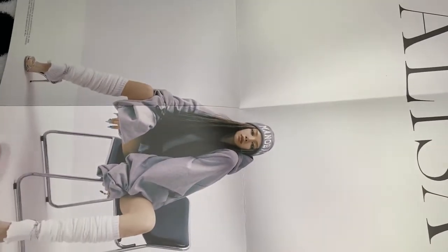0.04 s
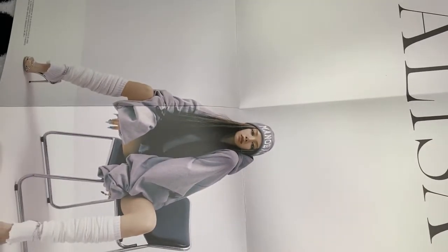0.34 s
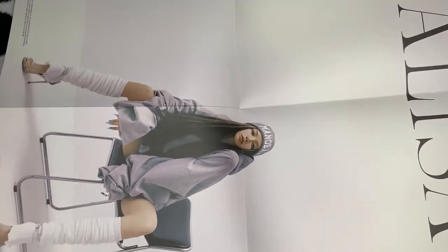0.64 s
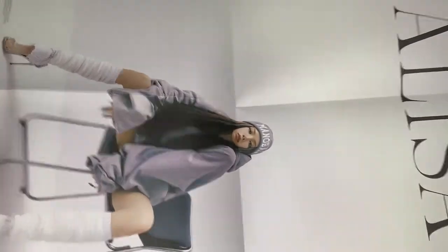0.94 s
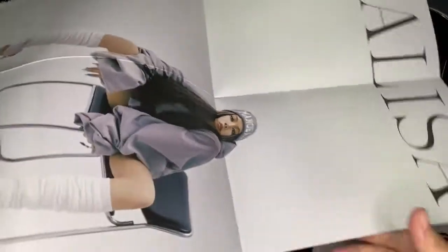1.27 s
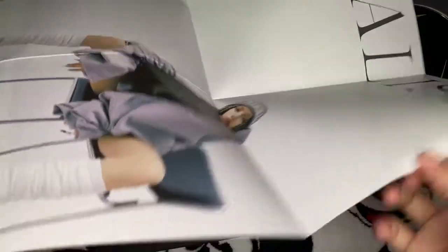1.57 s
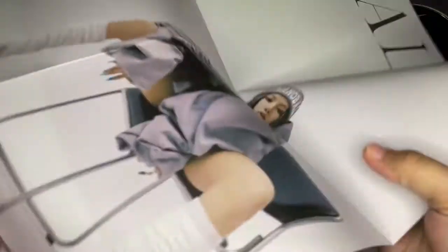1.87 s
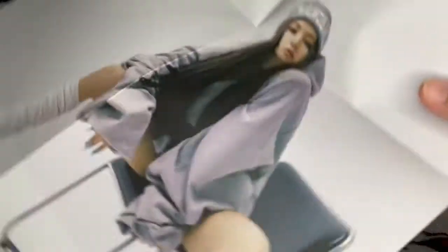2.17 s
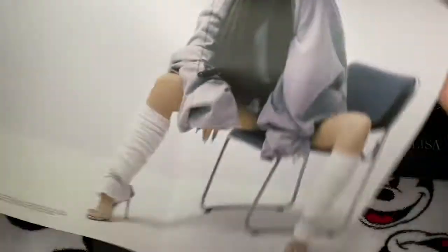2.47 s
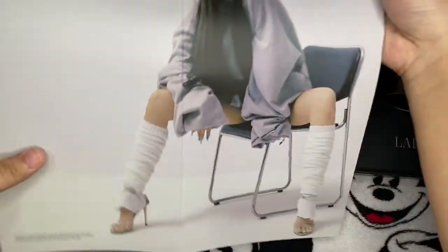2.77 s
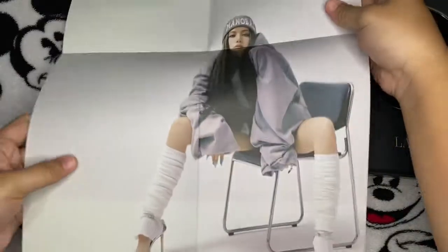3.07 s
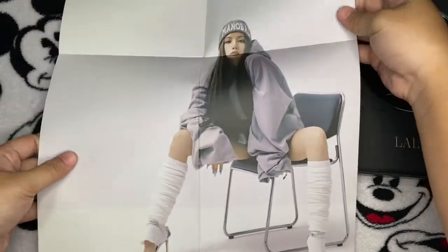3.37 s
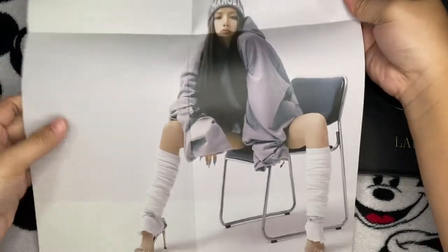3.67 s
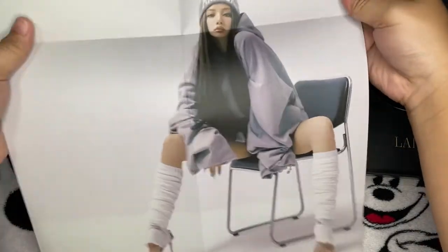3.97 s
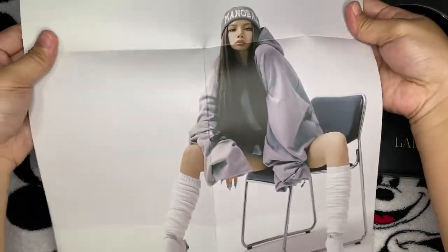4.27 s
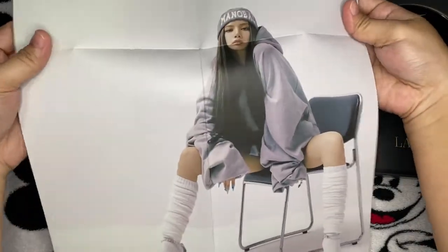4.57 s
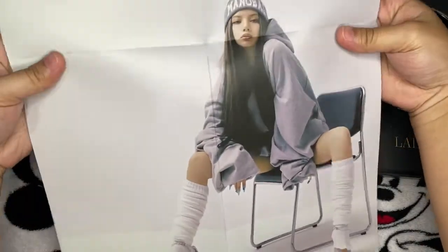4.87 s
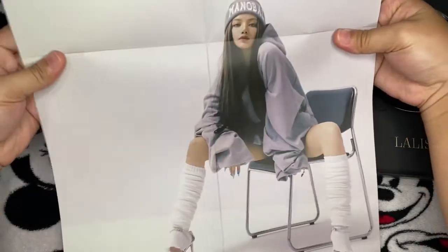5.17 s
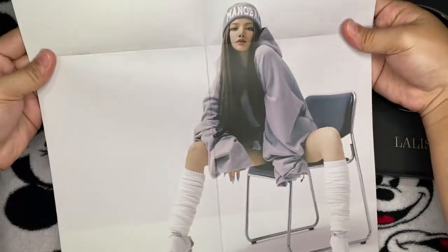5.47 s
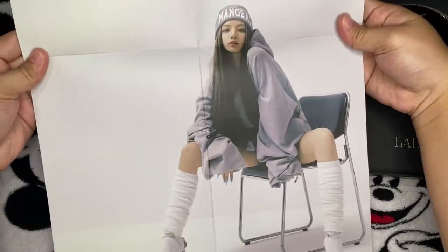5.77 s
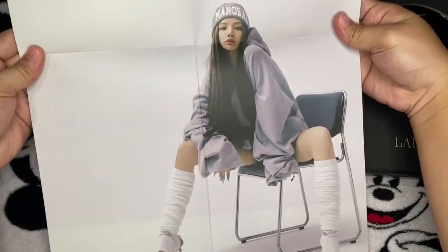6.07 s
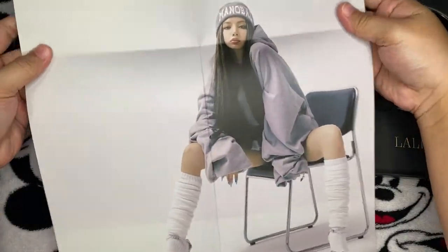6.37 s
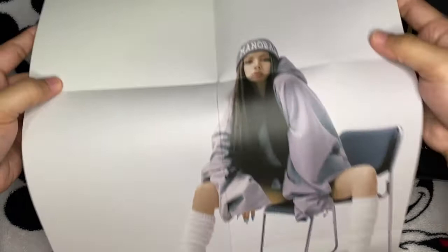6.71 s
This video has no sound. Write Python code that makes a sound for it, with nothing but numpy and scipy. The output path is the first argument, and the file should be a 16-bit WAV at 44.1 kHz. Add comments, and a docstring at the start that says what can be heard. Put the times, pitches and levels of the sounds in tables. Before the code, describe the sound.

For the first second there is only the soft, steady air and low hum of a fan in a small room. At about 0.9 seconds a large folded paper poster starts to move close to the microphone. Until around 2.5 seconds its creases pop in a quick, uneven run, strongest near 1.2 and 1.9 seconds, mixed with rustling, small sharp crackles, soft low flops and the hiss of paper sliding under fingers. A loud hollow pop with a crackle and flap comes at 3 seconds, followed by a smaller one at 3.4. Lighter pops and rustles occur around 4 seconds, and a crisp crack near 4.8. Another loud cluster of pops and low flaps lands between 4.9 and 5.1 seconds. The sheet then mostly rests, with a soft flex near 6.3 seconds and a faint brush at the end, over the continuing fan.

```python
"""A fan hums in a small room; after about a second, a large folded sheet of glossy paper pops and rustles
close by as it is lifted, turned and held open. Its creases buckle, and since bending waves are dispersive,
each pop runs through the sheet as a falling chirp. Dents flip with a hollow pock, whole panels flop over
and push the air, fibres crackle as they give way, and the paper hisses as it slides under the fingers."""
import sys
import numpy as np
from scipy import signal
from scipy.fft import rfft, irfft, next_fast_len
from scipy.io import wavfile

SR = 44100
rng = np.random.default_rng(int(sys.argv[2]) if len(sys.argv) > 2 else 0)


def inscribe(sig):
    """Save sig as 16-bit PCM at rate SR to the path in sys.argv[1].

    A 1-D sig is mono; a 2-D sig holds one channel per row.
    Samples are clipped to [-1, 1] before scaling.
    """
    pcm = np.round(np.clip(np.atleast_2d(sig).T, -1, 1) * 32767)
    wavfile.write(sys.argv[1], SR, pcm.astype(np.int16))


N = 306206
TIME = np.arange(N) / SR

# Levels in the tables are relative: each source adds its own gain.
# spectrum of the fan's moving air: (frequency [Hz], level [dB])
FAN_AIR_SPECTRUM = [(25, -30), (50, -1), (125, -3.5), (165, -11.5), (270, -3), (330, -12), (460, -7),
                    (780, -9.5), (970, -5.5), (1130, -11.5), (1750, -14.5), (2030, -13), (3200, -20.5),
                    (5000, -30.5), (9000, -35.5), (16000, -37)]
# partials of the fan's motor: (frequency [Hz], level [dB])
HUM_PARTIALS = [(58.3, -64.5), (172.5, -63.5), (231, -70)]
# how much of the fan's hum gets past the sheet: (time [s], level [dB])
HUM_LEVEL = [(0, 7.5), (1.9, 9.5), (2.75, -1.5), (3.6, 6.5), (4.6, 1), (5.3, 5), (6.94, 0)]
# reverberation of the room: (frequency [Hz], time to fall by 60 dB [s])
REVERB_TIMES = [(900, 0.23), (10000, 0.077)]
# likeness of diffuse sound in left and right: (frequency [Hz], coherence [0-1])
COHERENCE = [(100, 0.99), (280, 0.88), (600, 0.29), (2400, 0.28), (4500, 0.65), (7500, 1)]
# phase by which the right channel leads the left, widening the treble: (frequency [Hz], phase [rad])
STEREO_PHASE = [(0, 0), (600, -.1), (2900, .9), (5100, .4), (7000, 2.7), (9200, 3.7), (12000, 6.1),
                (16000, 8.3)]
# strokes of the hands along the sheet: (centre time [s], length [s], hiss level [dB], rustle level [dB])
HAND_STROKES = [(1.024, 0.071, -62.5, -53), (1.11, 0.059, -62.5, -53.5), (1.23, 0.078, -63, -60),
                (1.407, 0.035, -61.5, -60), (1.618, 0.11, -61, -54), (1.733, 0.032, -63, -49),
                (1.832, 0.069, -59.5, -52.5), (2.14, 0.3, -65, -58.5), (2.37, 0.21, -61.5, -68),
                (2.69, 0.045, -65, -79), (2.908, 0.043, -69, -51.5), (3.126, 0.15, -67, -71),
                (3.44, 0.14, -67, -56), (3.777, 0.028, -68, -75), (3.876, 0.048, -67, -79),
                (3.975, 0.067, -59.5, -53), (4.112, 0.047, -63, -57), (4.226, 0.027, -65.5, -54),
                (4.637, 0.11, -61, -57.5), (4.92, 0.092, -65.5, -50.5), (5.109, 0.048, -70, -46.5),
                (5.138, 0.085, -57, -58), (6.284, 0.063, -66.5, -66), (6.935, 0.058, -65, -63)]
# spectrum of sliding paper: (frequency [Hz], level [dB])
SLIDE_SPECTRUM = [(600, 0.5), (5000, 1.5), (9800, -2.5), (13000, -8), (16000, -6.5)]
# spectrum of bending paper: (frequency [Hz], level [dB])
RUSTLE_SPECTRUM = [(150, -7), (300, -2.5), (600, 0.5), (1200, -7), (3000, -13.5), (6000, -42)]
# spectrum of the air swayed by the sheet: (frequency [Hz], level [dB])
SWAY_SPECTRUM = [(25, -25), (55, 8), (300, -5), (600, -43)]
# bursts of fibres giving way: (time [s], level [dB], decay time [ms])
FIBRE_BURSTS = [(1.708, -31.5, 8.7), (1.7368, -37, 4), (2.0841, -22.5, 1.3), (2.3467, -29.5, 6.9),
                (3.04, -23.5, 2.1), (3.0793, -35, 2.3), (3.4155, -29.5, 1.9), (3.981, -38.5, 6),
                (4.278, -38, 1.1), (4.7756, -26, 5.9), (4.998, -35.5, 2.4), (5.03, -22.5, 2.2),
                (5.595, -40.5, 3), (6.258, -40, 4)]
# whole panels swinging over or flexing: (time [s], level [dB], tone [Hz])
PANEL_FLOPS = [(1.228, 3.5, 235), (1.75, 3.5, 103), (1.825, -1, 111), (2.002, 2.5, 130), (2.144, 4, 161),
               (2.333, 5, 109), (2.4144, 3.5, 132), (3.0432, 11.5, 213), (3.06, 8.5, 296),
               (3.097, 3.5, 181), (3.955, 4, 135), (4.548, 1, 89), (4.9232, 11, 242), (4.953, 12, 83.4),
               (5.036, 6, 218), (5.046, 13, 66.7), (6.291, 5, 185), (6.799, 0, 101)]
# taut dents flipping over: (time [s], level [dB], pitch [Hz])
DENT_FLIPS = [(1.106, -33.5, 1230), (1.1075, -28.5, 575), (1.129, -37.5, 534), (1.261, -32, 840),
              (1.3795, -35, 1830), (1.39, -38, 1830), (2.0875, -30, 1230), (3.41, -34, 1140),
              (3.42, -31.5, 650), (4.773, -36.5, 1000), (4.7796, -24, 858), (4.9415, -26.5, 547),
              (5.072, -36, 598)]
# creases popping through: (time [s], level [dB], tone [Hz], travel time at 1 kHz [ms])
CREASE_POPS = [(0.9206, 1.5, 760, 2.84), (0.943, -1, 890, 2.8), (1.0165, -3.5, 625, 4.5),
               (1.189, 10.5, 685, 3.2), (1.2249, 8, 1130, 1.9), (1.258, 1.5, 400, 3.7),
               (1.3773, 0, 810, 3.9), (1.4167, -2.5, 700, 3), (1.4358, 4.5, 990, 2.2),
               (1.4819, -10.5, 1600, 2), (1.705, -4, 905, 2.43), (1.8715, 3, 1400, 2.05),
               (1.874, 7.5, 534, 2.6), (1.9663, -1, 577, 4), (2.0835, -8, 3770, 2.72),
               (2.1124, 1.5, 540, 2.8), (2.139, -3, 397, 4), (2.158, -2, 367, 2.95), (2.345, -5, 764, 2.72),
               (2.422, -5.5, 486, 3), (2.5226, -8, 510, 3), (3.036, 12, 840, 2.92), (3.1517, 6, 665, 2.8),
               (3.4144, 3, 970, 2.6), (3.9487, -1.5, 665, 1.26), (3.975, -3, 596, 3),
               (4.123, -1.5, 790, 3.4), (4.9185, 9.5, 930, 3.2), (4.9405, -3, 800, 3.1),
               (5.0291, 5.5, 770, 1.5), (5.0423, -1, 526, 2.6), (5.122, -3.5, 760, 3)]


def from_db(db):
    """Amplitude ratio of a level in decibels."""
    return 10 ** (np.asarray(db) / 20)


def pan(left_db):
    """Level difference as direction: the left gains what the right loses."""
    return from_db([[left_db], [-left_db]])


def unit_rms(x):
    """Normalisation to unit mean power."""
    return x / np.sqrt(np.mean(x ** 2) + 1e-20)


def at_hz(table, hz):
    """Interpolation on a logarithmic frequency axis."""
    table_hz, values = np.transpose(table)
    return np.interp(np.log(hz + 1e-3), np.log(table_hz), values)


def drift(rate):
    """Random modulation of unit rms, with `rate` new values a second."""
    knots = rng.uniform(-0.75, 1, 4096)
    return unit_rms(np.interp(TIME * rate, np.arange(len(knots)), knots))


def add(out, time_s, sound):
    """Superposition: a stereo sound joins the mix at a given time."""
    start = max(round(time_s * SR), 0)
    out[:, start:start + sound.shape[1]] += sound[:, :N - start]


def bending_wave(hz, travel_ms):
    """Dispersion: bending waves run at a speed that grows as the root of frequency, so lows lag."""
    return np.exp(-4j * np.pi * travel_ms * np.sqrt(hz / 1000))


def diffuse(pair, spectrum, travel_ms=0):
    """Partial coherence: two unrelated signals, dispersed by any travel, form a diffuse stereo sound."""
    size = next_fast_len(N)
    hz = np.fft.rfftfreq(size, 1 / SR)
    mid, side = rfft(pair, size) * bending_wave(hz, travel_ms)
    coherence = np.clip(at_hz(COHERENCE, hz), 0, 1)
    stereo = np.sqrt(1 + coherence) * mid + np.sqrt(1 - coherence) * side * [[1], [-1]]
    low_cut = hz ** 2 / (hz ** 2 + 15 ** 2)
    return unit_rms(irfft(stereo * from_db(at_hz(spectrum, hz)) * low_cut, size)[:, :N])


def fan(air_db=-53.0, hum_db=-3.5, waver_db=3.0):
    """Broadband and tonal noise: steady moving air, and a wavering motor hum whose level rises and falls as the
    sheet shades it."""
    air = from_db(air_db) * diffuse(rng.standard_normal((2, N)), FAN_AIR_SPECTRUM)
    swell_db = np.interp(TIME, *np.transpose(HUM_LEVEL))
    hum = 0
    for hz, db in HUM_PARTIALS:
        amplitude = np.sqrt(2) * from_db(db + hum_db + swell_db + waver_db * drift(6.2))
        hum += amplitude * np.sin(2 * np.pi * hz * TIME + .5 * drift(5))
    return (air + hum) * pan(.5)


def room(x, size=16384):
    """Reverberation: a diffuse tail decays exponentially in each octave, sooner in the treble."""
    t, tail = np.arange(size) / SR, 0
    for low_hz in 60 * 2. ** np.arange(8):
        octave = signal.butter(2, [low_hz, 2 * low_hz], "band", fs=SR, output="sos")
        band = signal.sosfilt(octave, rng.standard_normal((2, size)))
        tail += band * 10 ** (-3 * t / at_hz(REVERB_TIMES, low_hz * np.sqrt(2)))
    tail *= np.clip((t - .003) / 0.0034, 0, 1)   # reflections begin after 3 ms
    bass_difference = signal.sosfilt(signal.butter(1, 400, fs=SR, output="sos"), tail[0] - tail[1])
    tail += bass_difference / 2 * [[-1], [1]]   # long waves reach left and right alike
    return signal.fftconvolve(x.mean(0)[None], unit_rms(tail) / np.sqrt(size), axes=1)[:, :N]


def slips(per_s, spread_db):
    """Stick-slip friction: two random trains of tiny impulses of uneven size."""
    sizes = from_db(spread_db * np.minimum(rng.exponential(1, (2, N)), 4)) * rng.standard_normal((2, N))
    return sizes * (rng.random((2, N)) < per_s / SR)


def shifting_resonances(x, depth_db, rate, bands):
    """Resonances shift as the sheet bends: each narrow band swells and fades by itself."""
    size = next_fast_len(N)
    hz = np.fft.rfftfreq(size, 1 / SR)
    spectrum, out = rfft(x, size), np.zeros((2, N))
    band_index = np.interp(np.log(hz + 1), np.log([300, 14000]), [0, bands - 1])
    for k in range(bands):
        band = irfft(spectrum * np.maximum(1 - np.abs(band_index - k), 0), size)[:, :N]
        gains = from_db(depth_db * np.sqrt(3) * rng.uniform(-0.97, 1, 4096))
        out += band * np.interp(TIME * rate, np.arange(len(gains)), gains)
    return unit_rms(out)


def handling(grip_hiss_db=-77.5, grip_rustle_db=-64.5, held_s=0.99, settle_db=-56.5, settle_s=0.026):
    """Incoherent powers add: grip, strokes and settling after pops give the hiss and rustle in dB."""
    held = np.clip(TIME / held_s, 0, 1) ** 8
    hiss, rustle = held * from_db(grip_hiss_db) ** 2, held * from_db(grip_rustle_db) ** 2
    for time_s, length_s, hiss_db, rustle_db in HAND_STROKES:
        near = np.abs(TIME - time_s) < 2 * length_s
        swell = .5 ** np.abs(2 * (TIME[near] - time_s) / length_s) ** 1.64   # a slightly pointed bell
        hiss[near] += from_db(hiss_db) ** 2 * swell
        rustle[near] += from_db(rustle_db) ** 2 * swell
    for time_s, db, _, _ in CREASE_POPS:
        after = (TIME > time_s) & (TIME < time_s + 10 * settle_s)
        rustle[after] += from_db(db + settle_db) ** 2 * np.exp(-(TIME[after] - time_s) / settle_s)
    return 10 * np.log10(np.array([hiss, rustle]) + 1e-20)


def sliding(hiss_db, gain_db=6.0, airy_hz=12200, hard_stroke_db=-58):
    """Friction under the fingers: dense slips hiss in surges, and hard strokes add an airy crackle."""
    envelope = from_db(hiss_db + gain_db + 1.43 * drift(50))
    hiss = diffuse(slips(per_s=5000, spread_db=0.33), SLIDE_SPECTRUM)
    hiss = shifting_resonances(hiss, depth_db=4.5, rate=36, bands=28)
    crackle = diffuse(slips(per_s=900, spread_db=1.5), SLIDE_SPECTRUM)
    airy = signal.sosfilt(signal.butter(2, airy_hz, "high", fs=SR, output="sos"), crackle)
    airy_envelope = from_db(hiss_db + gain_db + np.minimum(hiss_db - hard_stroke_db, 0))
    return envelope * hiss + airy_envelope * airy


def flexing(rustle_db, sway_db=-5.5):
    """Flexure: the bending sheet rustles in coarse slips, dispersed into chirps, and sways the air."""
    envelope = from_db(rustle_db + 3.3 * drift(45))
    chirps = diffuse(slips(per_s=900, spread_db=1.7), RUSTLE_SPECTRUM, travel_ms=3.0)
    rustle = envelope * shifting_resonances(chirps, depth_db=3.5, rate=54, bands=14)
    sway = from_db(rustle_db + sway_db) * diffuse(rng.standard_normal((2, N)), SWAY_SPECTRUM)
    return (rustle + sway) * pan(1.5)


def fibre_crackles(level_db=-11.0, rise_ratio=0.35, tick_db=19, size=2048):
    """Acoustic emission: fibres give way in a spray of ticks that builds to one sharp tick and dies."""
    out, lead_s = np.zeros((2, N)), .01
    ms = 1000 * (np.arange(size) / SR - lead_s)
    hz = np.fft.rfftfreq(size, 1 / SR)
    colour = from_db(at_hz([(500, 2), (3000, 2), (6400, -4.5), (15000, -13.5)], hz))
    for time_s, db, decay_ms in FIBRE_BURSTS:
        mid, side = rng.standard_normal((2, size))
        mid[np.abs(ms).argmin()] = from_db(tick_db)
        swell = np.exp(-np.maximum(ms, -ms / rise_ratio) / decay_ms)
        spray = (mid + .5 * side * [[1], [-1]]) * swell
        add(out, time_s - lead_s + .0005, from_db(db + level_db) * irfft(rfft(spray) * colour))
    return out


def buckle(tone_hz, travel_ms, lead_s, rise, fall, ring_db, q, damping_hz, echo_db, echo_ms, loss_db):
    """Buckling radiates a pulse: the direct wave, then weaker reflections from edges and folds."""
    size, echoes = 8192, 8
    hz = np.fft.rfftfreq(size, 1 / SR)
    ratio = hz / tone_hz
    pulse = 2 * ratio ** rise / (1 + ratio ** (rise + fall))   # spectral slopes below and above the tone
    delay = np.exp(-2j * np.pi * hz * lead_s)
    resonance = 1j * ratio / (1j * ratio + q * (1 - ratio ** 2))   # the dent swings on after popping
    pulse = pulse * delay * (1 + from_db(ring_db) * resonance) / (1 + (hz / damping_hz) ** 2)
    waves = bending_wave(hz, travel_ms) * np.ones((2, 1))
    apart = hz / (hz + 700)   # short waves differ more between left and right
    paths = rng.uniform(0.1285, 1, echoes)
    for path, sign, lean in zip(paths, rng.choice([-1, 1], echoes), rng.normal(0, 1, echoes)):
        gain = sign * from_db(echo_db - loss_db * path * np.sqrt(ratio))
        waves += gain * bending_wave(hz, travel_ms + path * echo_ms) * (1 + lean * apart * [[1], [-1]])
    return irfft(pulse * waves, size)


def panel_flops(level_db=2.5):
    """Air displacement: a whole panel swings over and pushes a soft, wobbling puff."""
    out, lead_s = np.zeros((2, N)), .02
    for time_s, db, tone_hz in PANEL_FLOPS:
        puff = buckle(tone_hz, travel_ms=1.453, lead_s=lead_s, rise=1.8, fall=4.0, ring_db=-7.5, q=6.6,
                      damping_hz=2500, echo_db=-8.5, echo_ms=7.03, loss_db=7.5)
        add(out, time_s - lead_s, from_db(db + level_db) * puff)
    return out * pan(1.0)


def dent_pocks(swell_cycles=1.49, wobble_cycles=0.23, overtone_ratio=2.22, overtone_db=-13, size=2048):
    """Damped oscillation: a flipped dent swells and dies in a few uneven swings, with one overtone."""
    out = np.zeros((2, N))
    for time_s, db, pitch_hz in DENT_FLIPS:
        cycles = pitch_hz * np.arange(size) / SR
        swell = (cycles / swell_cycles * np.exp(1 - cycles / swell_cycles)) ** 2
        uneven = np.interp(cycles, np.arange(size), rng.uniform(-0.96, 1, size))
        phase = 2 * np.pi * (cycles + wobble_cycles * uneven)
        ring = swell * (np.sin(phase) + from_db(overtone_db) * np.sin(overtone_ratio * phase))
        add(out, time_s, from_db(db) * ring * pan(2.5))
    return out


def crease_pops(level_db=-3.5, echo_db=-6.5, hollow_db=-11.0, ring_db_per_ms=1.63):
    """Snap-through buckling: each crease pops as a hollow, falling chirp, and far ones ring more."""
    out, lead_s = np.zeros((2, N)), .01
    for time_s, db, tone_hz, travel_ms in CREASE_POPS:
        faint_db = -0.42 * db   # faint pops hold a larger share of ring and reflections
        ring_db = hollow_db + faint_db + ring_db_per_ms * travel_ms
        pop = buckle(tone_hz, travel_ms, lead_s, rise=0.97, fall=2.51, ring_db=ring_db, q=2.3,
                     damping_hz=5430, echo_db=echo_db + faint_db, echo_ms=17, loss_db=24)
        add(out, time_s - lead_s, from_db(db + level_db - faint_db / 2) * pop)
    return out * pan(2.5)


def scene(reverb_db=-15.5):
    """Superposition of the sheet's transients, their reverberation, the handling noise and the fan."""
    transients = crease_pops() + dent_pocks() + panel_flops() + fibre_crackles()
    reverb = from_db(reverb_db) * room(transients)
    hiss_db, rustle_db = handling()
    return transients + reverb + sliding(hiss_db) + flexing(rustle_db) + fan()


def record(dry, cutoff_hz=15900):
    """A phase difference between the channels widens the treble; a steep low-pass cuts the top."""
    size = next_fast_len(N + 2048)
    hz = np.fft.rfftfreq(size, 1 / SR)
    lead = np.interp(hz, *np.transpose(STEREO_PHASE))
    widening = np.exp(.5j * lead * [[-1], [1]])
    low_pass = 1 / np.sqrt(1 + (hz / cutoff_hz) ** 160)
    return irfft(rfft(dry, size) * widening * low_pass, size)[:, :N]


dry = scene()
out = record(dry)
inscribe(out)
```